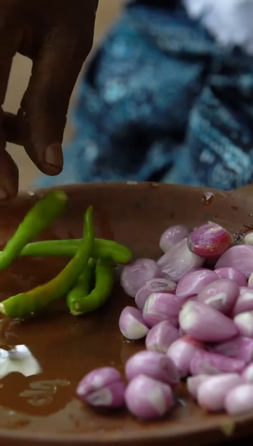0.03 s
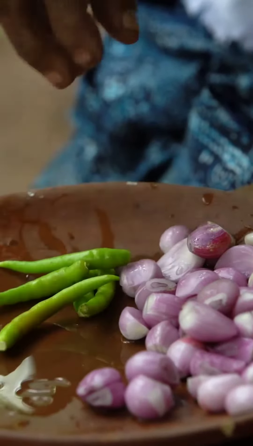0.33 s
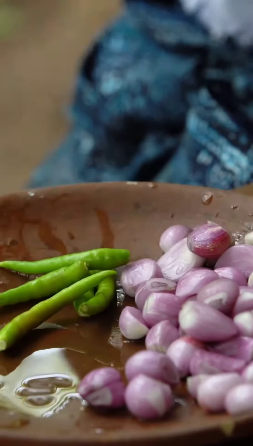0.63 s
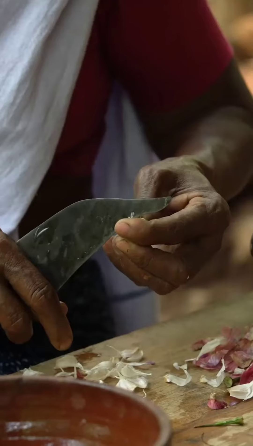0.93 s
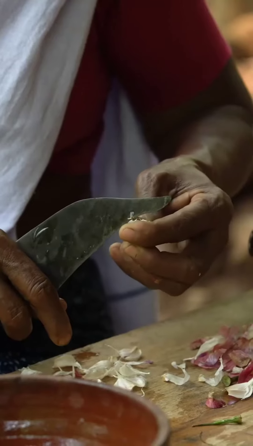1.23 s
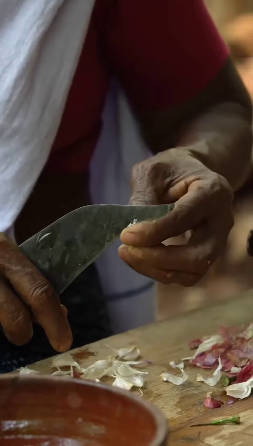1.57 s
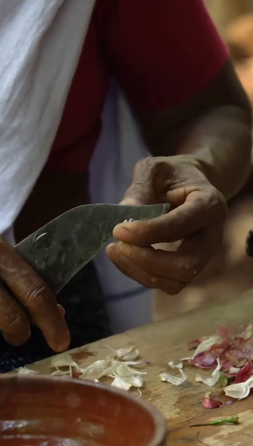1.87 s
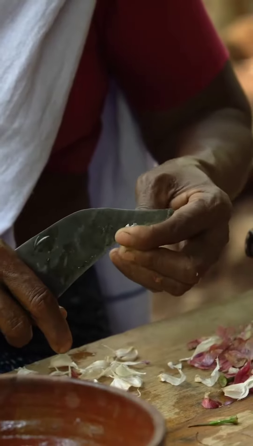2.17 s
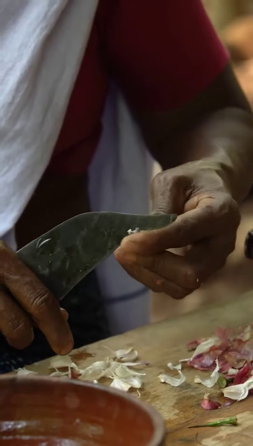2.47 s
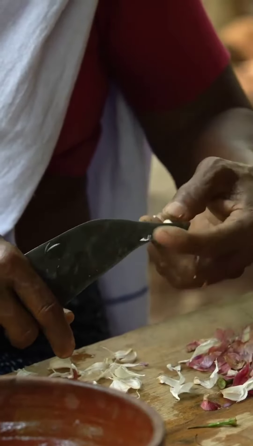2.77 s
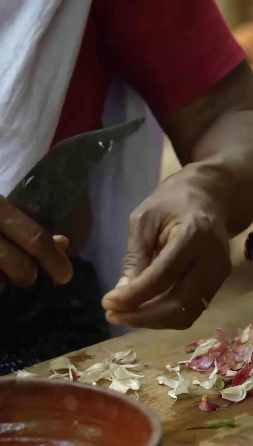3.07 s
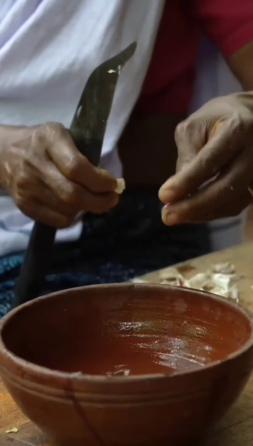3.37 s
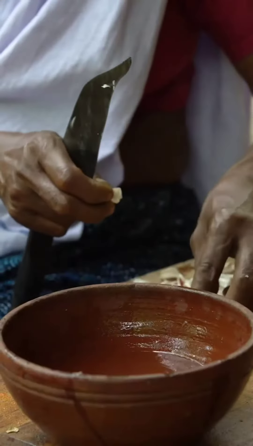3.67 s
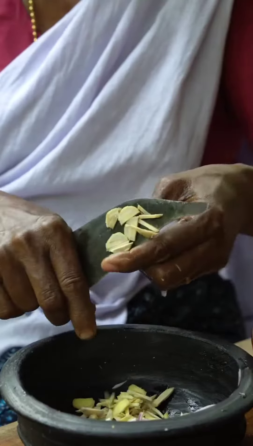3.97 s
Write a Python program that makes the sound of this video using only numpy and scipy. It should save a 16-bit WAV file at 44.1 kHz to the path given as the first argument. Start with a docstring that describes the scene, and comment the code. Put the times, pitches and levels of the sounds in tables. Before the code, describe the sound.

One garlic clove drops into a clay bowl, following tiny skin snaps and low wind rumble.

```python
"""Outdoors near trees, garlic is peeled with a knife and a clove drops into a clay bowl.
Dry skins snap and rustle and chillies tick into a wet dish, all as tiny puffs of noise.
The clove lands with two cracks, and the bowl rings briefly. Behind this, wind buffets the
microphone, insects shrill, birds whistle, and one far knock echoes through the trees."""
import sys
import numpy as np
from scipy import signal
from scipy.fft import rfft, irfft
from scipy.io import wavfile
from scipy.ndimage import map_coordinates

SR = 44100
rng = np.random.default_rng(int(sys.argv[2]) if len(sys.argv) > 2 else 0)


def master(y):
    """Save y as 16-bit WAV."""
    cut = np.clip(np.atleast_2d(y).T, -1, 1)
    pcm = np.round(cut * 32767)  # scale
    wavfile.write(sys.argv[1], SR, pcm.astype(np.int16))


N = 176400  # 4 seconds
TIME = np.arange(N) / SR

# Tone of each noise, from low to high: pitch_hz, relative_db
AIR_TONE = [(10,39),(25,23.5),(55,2.5),(130,2),(300,-3.5),(750,-6),(1300,-5.5),(2000,-13),(4000,-22.5),(16000,-43.5)]
HISS_TONE = [(800,-7.5),(2300,2.5),(3700,3),(10000,-12),(16000,-42)]
WIND_TONE = [(5,-1.5),(24,4.5),(62,-6.5),(100,-21),(135,-28.5),(180,-41),(260,-52.5),(500,-94),(1500,-110)]
LOW_INSECT_TONE = [(4000,-37),(4900,-21.5),(5450,0),(5850,3.5),(6100,-3.5),(6400,-15),(7000,-34.5)]
HIGH_INSECT_TONE = [(6000,-43.5),(6900,-6),(7400,-0.5),(7750,-40),(8500,-46)]
KNOCK_TONE = [(100,-6),(250,-3.5),(800,2.5),(2400,-8),(3600,-17.5),(10000,-47)]
RUSTLE_TONE = [(400,-53),(1800,1),(4200,2.5),(8000,-8.5),(10000,-7),(14000,-11.5),(16000,-13.5)]
CLICK_TONE = [(300,-47),(1500,-2),(2800,-6),(4000,4),(5000,-3),(10000,-11.5),(16000,-38)]
CLICK_HISS_TONE = [(2000,1),(5000,-17),(7000,-3.5),(10000,5),(16000,1)]
CRACK_TONE = [(200,-5),(800,-1),(1350,5.5),(3100,-7),(4050,0),(5800,-12),(7300,-21),(8900,-20),(12000,-31)]

# Base loudness of each background sound: time_s, level_db
AIR_LEVELS = [(0,-39),(.95,-37.5),(1.3,-41),(2.1,-39),(2.6,-36),(3.0,-39),(3.85,-36)]
HISS_LEVELS = [(0,-61.5),(.7,-67.5),(1.2,-68.5),(3.85,-69.5)]
WIND_LEVELS = [(0,-55),(.5,-64),(.7,-42),(.82,-28.5),(1.05,-23.5),(1.9,-19.5),(2.35,-21.5),(2.9,-24),(3.25,-23.5),(3.38,-28),(3.55,-30),(3.69,-15),(3.87,-19.5),(3.99,-41)]
LOW_INSECT_LEVELS = [(0,-59),(.45,-64.5),(.66,-57),(.85,-65.5),(1.4,-60.5),(1.68,-64.5),(2.2,-64.5),(2.35,-60),(2.65,-61.5),(3.3,-66),(3.58,-59.5),(3.8,-66)]
HIGH_INSECT_LEVELS = [(.72,-68.5),(.88,-81.5)]

# How long echoes from trees and nearby surfaces take to fade by 60 dB: pitch_hz, fade_s
TREE_ECHO = [(200,0.81),(1400,1.19),(4000,0.28)]
NEARBY_ECHO = [(1200,0.43),(3500,0.2),(14000,0.4)]

# Base speed of the swirling wind: time_s, speed_ratio
WIND_SPEEDS = [(.8,0.94),(1.1,0.82),(1.3,1.054),(2.7,0.99),(3.4,.78),(3.75,1.08)]
# Single gusts of wind: peak_s, boost_db
WIND_GUSTS = [(1.098,7),(2.2,4),(2.721,3),(3.078,1.5),(3.767,7.5)]
# Bird whistles: start_s, length_s, first_pitch_hz, last_pitch_hz, level_db, waver_share, echo_share
BIRD_NOTES = [(-.04,.12,1256,1237,-50.5,0.057,0.5),(0.01,0.12,1856,1682,-55.5,0.025,0.08),(0.028,0.18,1540,1405,-54,.11,0.58),(0.175,0.43,590,545.5,-70,0.027,0.1),(.868,0.22,900,1244,-68.5,0.122,0.4),(1.852,0.13,1075,1150,-59.5,0.019,0.15),(1.927,0.1,1945,1875,-48.5,0.024,0.08),(2.177,.085,1950,1403,-50,0.052,0.16),
              (2.23,0.187,1415,1449,-45.5,0.015,0.13),(2.501,0.087,1166,1309,-53,0.02,0.33),(2.628,0.071,1010,943,-60.5,0.013,0.1),(3.69,0.16,1109,1435,-67,0.087,0.82)]
# Short rustles; the last row is a faint hiss that swells at the very end: start_s, length_s, level_db
RUSTLE_SWELLS = [(0.319,0.035,-55.5),(0.712,0.064,-58.5),(.82,0.18,-68.5),(1.535,0.18,-69),(1.883,0.08,-66),(2.136,0.098,-68.5),(2.279,0.046,-59),(2.393,0.055,-59.5),(3.763,0.048,-67.5),(3.904,0.18,-63)]
# Wet ticks of chillies and snaps of garlic skin: start_s, level_db, fade_s, hiss_boost_db
TICKS_AND_SNAPS = [(0.089,-49.5,0.0054,1),(0.15,-43,0.0037,0.5),(0.337,-48,0.0097,-1),(0.737,-49,.003,-4),(0.778,-60,0.0081,5),(.8827,-60,.002,4),(0.948,-55,0.0033,-2),(1.065,-54,0.0062,-1.5),
                   (1.779,-50.5,0.0046,-15),(2.091,-45.5,0.0022,-28),(2.157,-61,.004,5),(2.254,-63,0.0023,3),(2.303,-51,0.0025,-9),(2.306,-60,0.0038,13),(2.419,-53,0.0018,1),(2.426,-53.5,0.0038,-4),(2.528,-52,0.0051,-3),(2.714,-48.5,0.0037,-22),(3.374,-50,0.0016,-31)]
# The clove lands and tumbles: start_s, level_db
CLOVE_HITS = [(3.418,-28),(3.4283,-41)]
# Ringing notes of the clay bowl, each fading by 60 dB: pitch_hz, level_db, fade_s
BOWL_NOTES = [(1257,-22,0.071),(1365,-30,0.069),(1775,-41,0.05)]


def gain(db):
    """Turns decibels into a number to multiply a sound by."""
    return 10 ** (np.asarray(db) / 20)


def normalize(sound):
    """Scales a sound to an average strength (rms) of 1."""
    return sound / np.sqrt(np.mean(sound ** 2) + 1e-20)


def at_pitch(table, hz):
    """Reads a table between its pitches, spaced by octaves."""
    pitches, values = np.transpose(table)
    return np.interp(np.log(hz + 1), np.log(pitches + 1), values)


def over_time(table):
    """Reads a table of times and values at every sample."""
    return np.interp(TIME, *np.transpose(table))


def add(mix, start_s, sound):
    """Mixes a sound in at its start time."""
    part = mix[max(0, round(start_s * SR)):][:len(sound)]
    part += sound[:len(part)]


def shape_tone(sound, tone):
    """Gives a sound a tone, with a filter that rings only after each hit."""
    log_gain = np.log(gain(at_pitch(tone, abs(np.fft.fftfreq(2048, 1 / SR)))))
    response = np.exp(np.conj(signal.hilbert(log_gain)))
    taps = np.fft.ifft(response).real[:1024]
    return signal.oaconvolve(sound, taps / np.linalg.norm(taps))[:N]


def noise(tone):
    """Steady noise with the given tone."""
    gains = gain(at_pitch(tone, np.fft.rfftfreq(N, 1 / SR)))
    return normalize(irfft(rfft(rng.standard_normal(N)) * gains, N))


def drift(rate_hz):
    """A random wobble, up to about the given rate."""
    gains = np.exp(-(np.fft.rfftfreq(N, 1 / SR) / rate_hz) ** 2)
    return normalize(irfft(rfft(rng.standard_normal(N)) * gains, N))


def puff(fade_s, rise_s):
    """A puff of noise that rises fast, then falls to about a third every fade_s."""
    t = np.arange(0, 7 * fade_s, 1 / SR)
    return rng.standard_normal(SR)[:len(t)] * (1 - np.exp(-t / rise_s)) * np.exp(-t / fade_s)


def echo(sound, fade_times, bounces_per_s=2500):
    """Sound bounces back from many surfaces, each pitch fading at its own speed."""
    bounces = rng.standard_normal(SR) * (rng.random(SR) < bounces_per_s / SR)
    hz, t, bands = signal.stft(bounces, SR, nperseg=256)
    fade = gain(-60 * t / at_pitch(fade_times, hz)[:, None])
    tail = signal.istft(bands * fade, SR)[1]
    return signal.fftconvolve(sound, tail / np.linalg.norm(tail))[:N]


def air(wobble_db=2.0):
    """Open air makes a deep, unsteady wash with a faint hiss above it."""
    wash = noise(AIR_TONE) * gain(over_time(AIR_LEVELS) + wobble_db * drift(30))
    hiss = noise(HISS_TONE) * gain(over_time(HISS_LEVELS))
    return wash + hiss


def wind(wobble_db=2.0, gust_half_s=0.035, speedup_per_db=0.0174, smooth_s=0.078):
    """Swirls of air thump the microphone; in a gust they pass faster, so the rumble is higher."""
    gust_db = sum(db * np.exp(-((TIME - peak_s) / gust_half_s) ** 2) for peak_s, db in WIND_GUSTS)
    level_db = over_time(WIND_LEVELS) + gust_db + wobble_db * drift(14)
    speed = over_time(WIND_SPEEDS) * (1 + speedup_per_db * gust_db)
    swirls = map_coordinates(noise(WIND_TONE), [np.cumsum(speed)], order=3, mode="grid-wrap")
    # Even out the swirls' own swells before setting their loudness.
    power = signal.fftconvolve(swirls ** 2, signal.windows.hann(int(2 * smooth_s * SR)), "same")
    return gain(level_db) * normalize(swirls / np.sqrt(power))


def insects(throb_hz=41.7, throb_depth=0.18, low_boost_db=3.0, flutter_db=1):
    """Many insects blur into two shrill bands of noise that throb slightly together."""
    rate_hz = throb_hz * (1 + 0.088 * drift(2.5))
    throb = 1 + throb_depth * np.sin(2 * np.pi * np.cumsum(rate_hz) / SR)
    low = noise(LOW_INSECT_TONE)
    low *= gain(over_time(LOW_INSECT_LEVELS) + low_boost_db + flutter_db * drift(20))
    high = noise(HIGH_INSECT_TONE) * gain(over_time(HIGH_INSECT_LEVELS))
    return throb * (low + high)


def birds():
    """Birds whistle sliding, wavering notes; the farther ones arrive more as echo from the trees."""
    direct, scattered = np.zeros((2, N))
    waver = drift(rate_hz=130)
    for start_s, length_s, first_hz, last_hz, level_db, waver_share, echo_share in BIRD_NOTES:
        progress = np.clip((TIME - start_s) / length_s, 0, 1)
        pitch_hz = (first_hz + (last_hz - first_hz) * progress) * (1 + waver_share * waver)
        swell = abs(np.sin(np.pi * progress)) ** 0.65
        note = gain(level_db) * swell * np.sqrt(2) * np.sin(2 * np.pi * np.cumsum(pitch_hz) / SR)
        direct += np.sqrt(1 - echo_share) * note
        scattered += np.sqrt(echo_share) * note
    return direct + echo(scattered, TREE_ECHO)


def far_knock(start_s=3.15, level_db=-44, echo_gain=0.81):
    """One dull, distant blow echoes through the trees."""
    blow = np.zeros(N)
    add(blow, start_s, gain(level_db) * puff(fade_s=0.04, rise_s=0.001))
    knock = shape_tone(blow, KNOCK_TONE)
    return knock + echo_gain * echo(knock, TREE_ECHO)


def rustles(grains_per_s=2200, spread_db=3):
    """Tiny grains of noise blur into short rustles, and into a faint hiss at the very end."""
    grains = rng.standard_normal(N) * gain(spread_db * np.minimum(rng.exponential(1, N), 3))
    grains *= rng.random(N) < grains_per_s / SR
    swells = np.zeros(N)
    for start_s, length_s, level_db in RUSTLE_SWELLS:
        progress = np.clip((TIME - start_s) / length_s, 0, 1)
        swells += gain(level_db) * np.sqrt(abs(np.sin(np.pi * progress)))
    return shape_tone(normalize(grains) * swells, RUSTLE_TONE)


def ticks_and_snaps(hiss_stretch=1.18):
    """Short clicks, each with a burst of high hiss that starts more softly and lasts a bit longer."""
    clicks, hiss = np.zeros((2, N))
    for start_s, level_db, fade_s, hiss_boost_db in TICKS_AND_SNAPS:
        add(clicks, start_s, gain(level_db) * puff(fade_s, rise_s=0.00017))
        add(hiss, start_s, gain(level_db + hiss_boost_db) * puff(hiss_stretch * fade_s, rise_s=0.0011))
    return shape_tone(clicks, CLICK_TONE) + shape_tone(hiss, CLICK_HISS_TONE)


def clove_in_bowl(ring_rise_s=0.0047, echo_db=-9):
    """Each hit of the clove is a dry crack; the first makes the hollow clay bowl ring briefly."""
    ring, cracks = np.zeros((2, N))
    t = TIME[:SR // 2]
    notes = sum(gain(db - 60 * t / fade_s) * np.sin(2 * np.pi * hz * t) for hz, db, fade_s in BOWL_NOTES)
    landing_s = CLOVE_HITS[0][0]
    add(ring, landing_s, notes * (1 - np.exp(-t / ring_rise_s)))
    for start_s, level_db in CLOVE_HITS:
        add(cracks, start_s, gain(level_db) * puff(fade_s=0.0024, rise_s=0.0001))
    return shape_tone(cracks, CRACK_TONE) + ring + gain(echo_db) * echo(ring, NEARBY_ECHO)


def scene(echo_db=-6.5):
    """Hands work close by, in front of the outdoor background, in one channel."""
    crackle = ticks_and_snaps() + rustles()
    close_sounds = crackle + gain(echo_db) * echo(crackle, NEARBY_ECHO) + clove_in_bowl()
    return (close_sounds + far_knock() + birds() + insects() + air() + wind())[None]


def record(dry):
    """Cuts away the very highest treble."""
    low_pass = signal.firwin(511, cutoff=15900, window=("kaiser", 9), fs=SR)
    return signal.oaconvolve(dry, low_pass[None], "same")


dry = scene()
out = record(dry)
master(out)
```